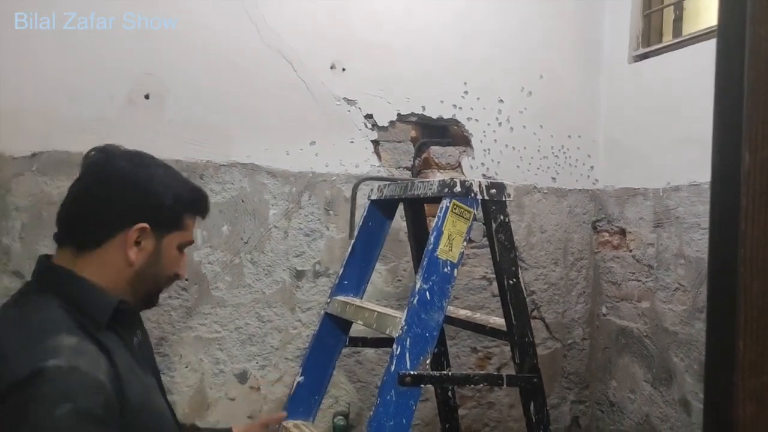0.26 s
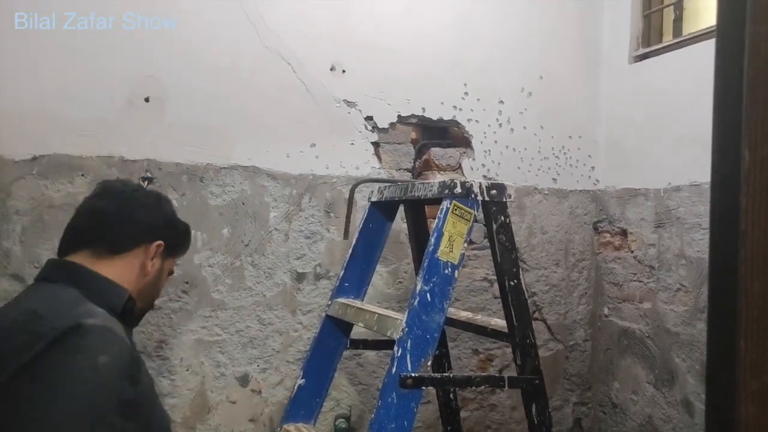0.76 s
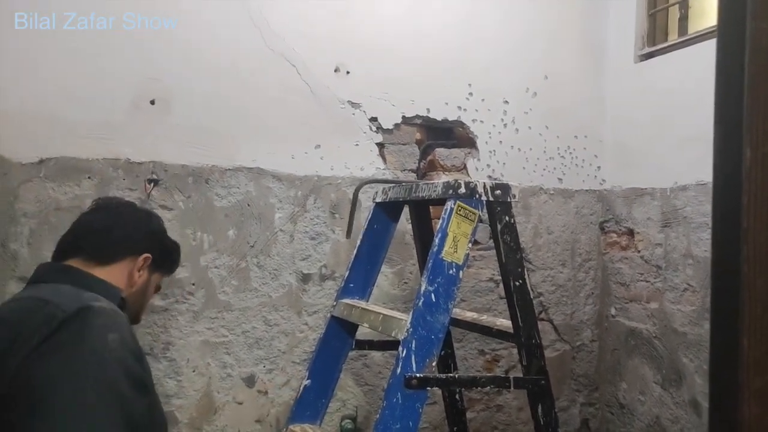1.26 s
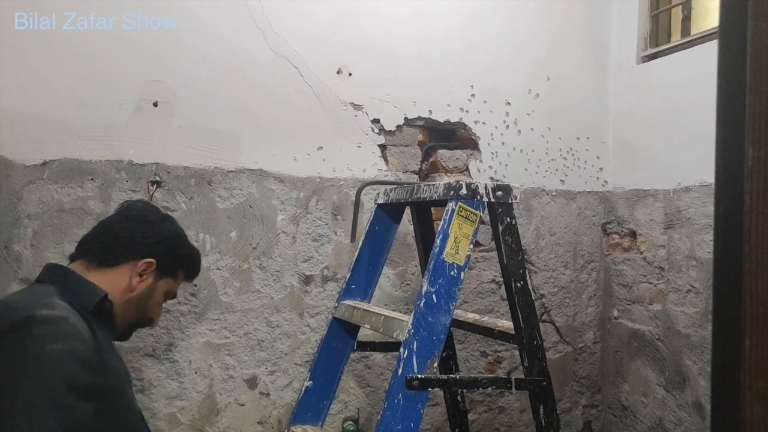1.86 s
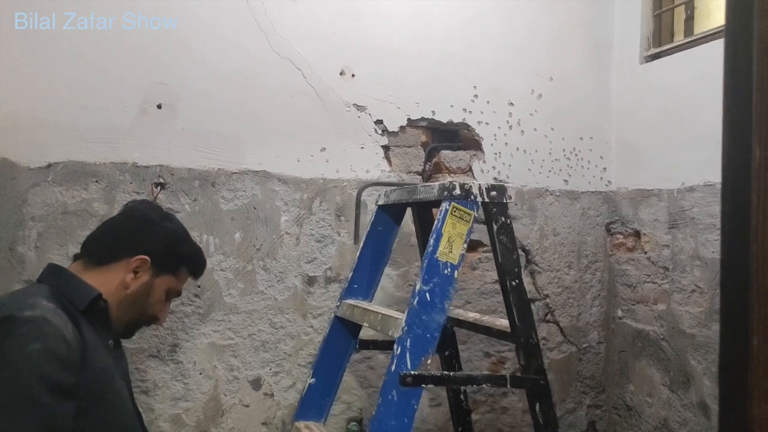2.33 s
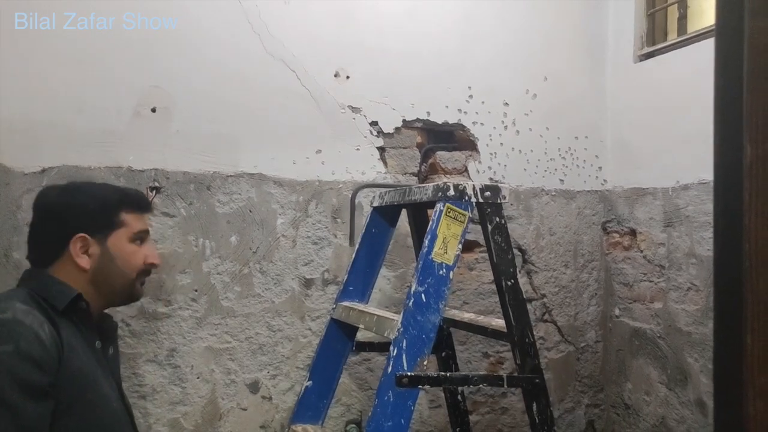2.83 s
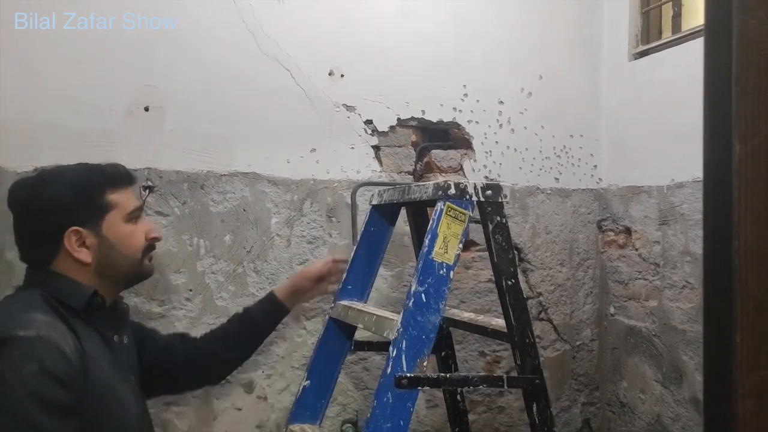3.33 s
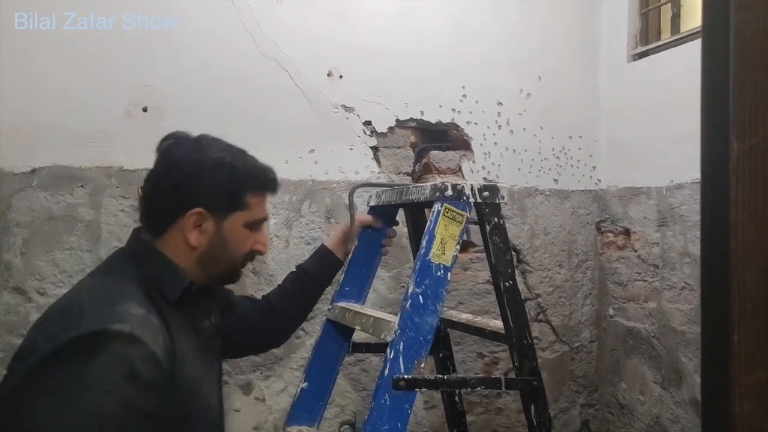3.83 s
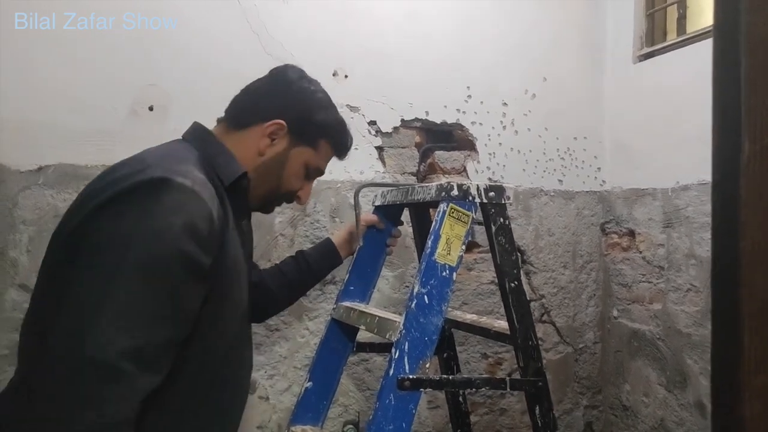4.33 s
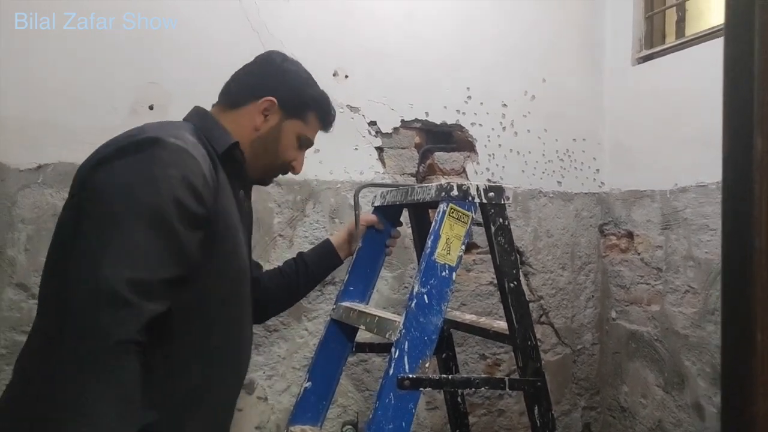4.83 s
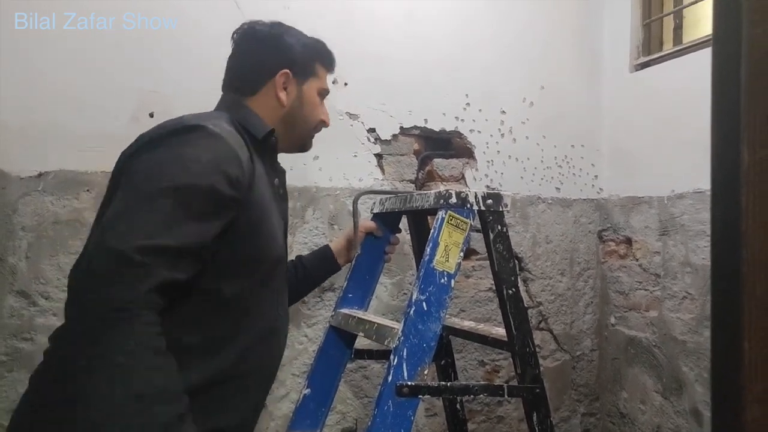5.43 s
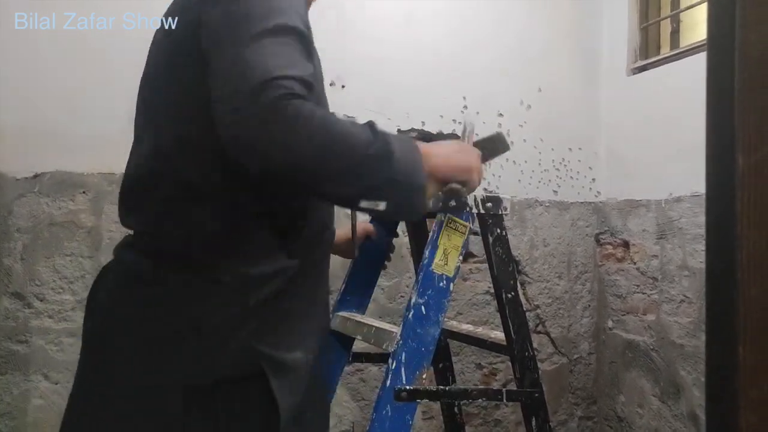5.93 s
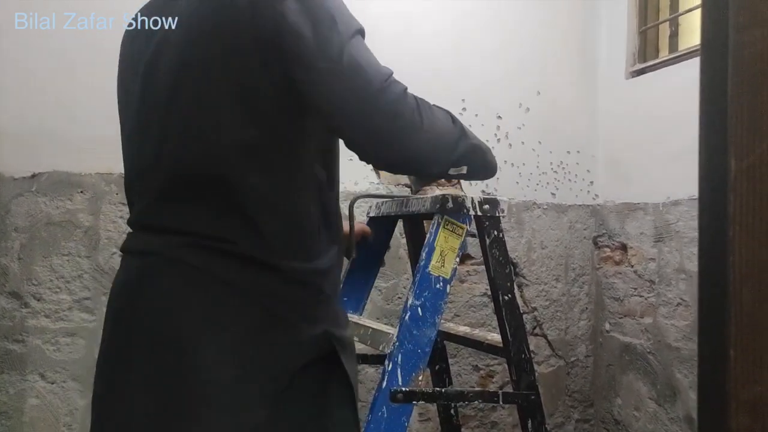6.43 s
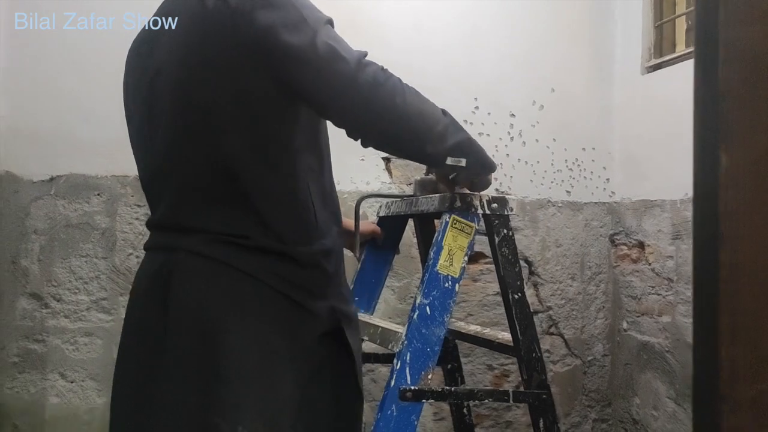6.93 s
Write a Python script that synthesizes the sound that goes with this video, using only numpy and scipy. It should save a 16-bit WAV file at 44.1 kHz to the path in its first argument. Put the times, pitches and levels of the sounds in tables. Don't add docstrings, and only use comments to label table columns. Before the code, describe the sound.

Close stereo phone pickup in a bare, echoing room: gritty scuffs and soft bumps against the microphone, then a dry ticking creak that speeds up and slows down. More scraping leads to a hollow low thud, then a sharp metallic ladder clang rings out. Faint treads and little squeaks fill a quieter spell before loud irregular knocks and rough scraping over hollow metal.

```python
import sys
import numpy as np
from scipy import signal
from scipy.fft import rfft, irfft, next_fast_len
from scipy.io import wavfile
from scipy.ndimage import uniform_filter1d

SR = 44100
rng = np.random.default_rng(int(sys.argv[2]) if len(sys.argv) > 2 else 0)


def volts_from_db(level):
    exponent = np.asarray(level, float) / 20
    return 10 ** exponent


def dump_mix(stems):
    frames = np.atleast_2d(stems).T
    limited = np.clip(frames, -1, 1)
    pcm = np.round(limited * 32767).astype(np.int16)
    wavfile.write(sys.argv[1], SR, pcm)


N = 316197

# pitch_hz, density_db [dB per Hz]
MIC_HISS = [(15, 13), (300, -23), (1500, -42), (4200, -44), (9700, -28.5), (16000, -17)]
# pitch_hz, density_db [dB per Hz]
RUSTLE_COLOUR = [(60, -35), (150, -4), (230, -2.5), (400, -2), (700, -9), (1100, -5.5), (2500, -9.5),
                 (5000, -18.5), (9000, -28)]
# start_s, effort_db
STIR_EFFORT = [(0.0, -18.5), (0.12, -53), (0.2, -27.5), (0.66, -42), (1.24, -32), (1.92, -35.5),
               (2.27, -18.5), (2.41, -34.5), (2.78, -31), (2.95, -39), (3.8, -35), (4.2, -45.5),
               (4.62, -41.5), (5.11, -44.5), (5.55, -36.5), (5.89, -44.5), (6.49, -42.5), (6.9, -12)]
# pitch_hz, likeness [0-1]
PORT_LIKENESS = [(30, .55), (130, .95), (470, .985), (750, .6), (1400, 0), (16000, 0)]
# pitch_hz, left_minus_right_db
PORT_BALANCE = [(100, 0), (700, 3.5), (1300, -4), (2400, -1), (4400, 17.5), (6200, 4.5), (7000, 0),
                (7600, 68), (9000, 60), (11000, 5.5), (16000, 25)]
# pitch_hz, t60_s
ROOM_DECAY = [(100, 0.46), (400, 0.57), (1000, 0.56), (3000, 0.27), (8000, 0.31), (16000, 0.049)]
# pitch_hz, width_hz, level_db
ROOM_RESONANCES = [(340, 14, 7), (675, 45, -5.5), (905, 217, 5.5), (1200, 68, -3), (1573, 610, 5),
                   (2430, 160, 2), (3300, 290, 3.5)]
# start_s, peak_db
PORT_TAPS = [
    (0.104, -4.5),
    (0.153, -3.5),
    (0.21, -6.5),
    (0.251, -4.5),
    (0.349, -9.5),
    (0.642, -2),
    (0.718, -12.5),
    (0.867, -15),
    (1.834, 2.5),
]
# start_s, peak_db
LOOSE_TICKS = [
    (1.078, -27),
    (1.108, -18),
    (1.14, -18),
    (1.155, -23),
    (1.203, -16.5),
]
# start_s, length_s, start_hz, end_hz, level_db
METAL_SQUEALS = [
    (2.49, 0.064, 4860, 4870, -43),
    (4.945, 0.175, 3800, 3580, -50),
    (4.948, 0.11, 3500, 3380, -53),
    (5.14, .04, 3500, 3430, -51),
    (6.71, 0.095, 5410, 5455, -27.5),
    (5.92, 0.07, 1890, 1860, -52),
]
# start_s, slip_rate [slips per s]
SLIP_RATE = [
    (1.092, 101.1),
    (1.15, 72.6),
    (1.21, 45.5),
    (1.26, 46.7),
    (1.31, 77.7),
    (1.40, 187.5),
    (1.46, 197.85),
    (1.54, 109.5),
    (1.585, 52.4),
]
# start_s, peak_db
LONE_SLIPS = [(1.5998, -29.5), (1.6373, -26), (1.797, -26.5), (1.839, -28), (1.8724, -28.5), (1.903, -28),
              (1.934, -29), (1.977, -26.5), (2.0344, -29), (2.596, -30.5)]
# pitch_hz, width_hz, level_db
JOINT_MODES = [(2500, 410, 3), (3400, 360, 6.5), (3780, 340, 6), (4290, 630, 10), (6290, 210, 1),
               (6540, 520, 3), (7720, 460, 0.5), (8770, 470, 4.5), (9850, 290, 2.5), (4660, 440, -2)]
# pitch_hz, width_hz
SILENT_BANDS = [(5500, 300), (7150, 120), (8450, 200)]
# start_s, peak_db, pitch_hz, t60_s
HOLLOW_THUDS = [(.104, -29, 200, .05), (.21, -29, 200, .05), (.254, -30, 220, 0.046),
                (1.45, -29.5, 171, 0.14), (2.631, -0.5, 197, 0.075), (2.65, -5, 225, 0.14),
                (2.664, -8.5, 232.5, 0.14), (2.7, -15, 236, 0.12), (2.735, -10, 188.5, .12),
                (2.742, -16, 456, 0.06), (2.77, -18, 204, 0.11), (2.82, -19.5, 217, 0.14),
                (2.85, -23, 241, 0.12), (6.598, -16, 268, 0.2), (6.66, -16.5, 339, 0.18),
                (6.78, -21, 332, 0.19), (6.859, -13, 374, .07), (6.885, -9.5, 340, 0.16),
                (6.906, -23, 300, 0.074), (6.92, -6, 349, 0.078), (6.934, -4, 355, 0.17),
                (6.982, -5.5, 350, 0.18), (7.012, -13.5, 352, 0.33), (7.083, -15, 360, 0.1)]
# start_s, peak_db
FRAME_BLOWS = [
    (3.166, -39),
    (3.773, -19),
    (3.779, -9),
    (3.813, -16),
    (4.56, -44),
    (5.054, -49),
    (5.918, -67),
    (6.579, -26),
    (6.929, -29),
]
# pitch_hz, level_db, t60_s
FRAME_MODES = [(475, -9, .8), (435, -10, .7), (885, -12, 0.35), (924, 0.5, 0.93), (957, 0, 0.31),
               (1020, -6, 0.48), (820, -14, .5), (1363, -6.5, 0.86), (1412, -5, 0.94), (1660, -9, 0.54),
               (1747, -1, 0.49), (2296, 0, .6), (2547, -5, .6), (2720, -3, .6), (1207, -12, 1),
               (3475, -5, .35), (970, 5, 0.11)]
# pitch_hz, level_db, t60_s
RUNG_MODES = [(854, -24, 0.67), (940, -1.5, 2.3), (970, -21, 2), (1080, 0, 1), (1280, 4, 1.4),
              (1385, 3.5, 1.1), (1520, -1, 0.83), (1790, 4, 1.03), (3545, 8, 0.38), (2300, 12.5, 0.57),
              (2960, 8, 0.45)]
# start_s, length_s, pitch_hz, level_db
THIN_SINGS = [(2.45, 0.15, 931, -43), (5.055, 0.09, 864, -50), (6.16, 0.04, 1850, -56),
              (7.0, 0.17, 536, -36), (6.725, 0.094, 1377, -26), (6.726, 0.067, 2690, -23),
              (6.737, 0.072, 3350, -27), (6.95, 0.13, 7720, -40.5)]
# start_s, length_s, pitch_hz, level_db
HOLLOW_HUMS = [(0.0, 0.37, 308, -37.5), (1.475, 0.03, 7900, -46), (2.09, 0.1, 947, -32),
               (2.09, 0.053, 1570, -27.5), (2.295, 0.025, 7750, -30), (2.635, 0.45, 32.3, -29.5),
               (3.2, 0.047, 815, -48), (3.776, 0.094, 1020, -33), (3.78, 0.09, 480, -27.5),
               (5.1, 0.14, 161, -48), (5.62, 0.23, 155.3, -48.5), (5.318, 0.12, 1307, -34),
               (5.33, 0.11, 1660, -39.5), (6.571, 0.061, 8400, -33), (6.6, 0.093, 258, -42),
               (6.7, 0.1, 340, -32), (6.93, 0.04, 849, -17), (6.955, 0.065, 1000, -20.5)]
# start_s, length_s, pitch_hz, level_db
DAMPED_RASPS = [(3.87, 0.3, 1400, -43.5), (3.8, 0.2, 183, -42.5), (2.2, 0.26, 304, -35),
                (2.632, 0.13, 460, -30.5), (2.633, 0.22, 198, -28), (3.774, 0.051, 3970, -21),
                (3.4, 0.047, 1240, -46), (2.15, 0.46, 134, -38.5), (2.1, 0.08, 1600, -35),
                (3.4, 0.12, 360, -51), (5.65, 0.08, 970, -41.5), (6.59, 0.072, 970, -20.5),
                (6.737, 0.065, 3300, -24.5), (6.933, 0.1, 540, -32), (7.027, 0.052, 5100, -28)]
# pitch_hz, density_db [dB per Hz]
GRIT_COLOUR = [(59, -72), (100, -13), (165, -13.5), (238, -17), (282, -10.5), (348, -9.5), (421, -13.5),
               (478, -11), (509, -18.5), (959, -15), (1850, -15), (2760, -13), (5090, -29.5), (7610, -25),
               (10200, -29), (15600, -33.5)]
# start_s, level_db, weight_db, sand_db
SHORT_TREADS = [(0.176, -14, -21, -12.5), (0.261, -12.5, -19, -0.5), (0.448, -29.5, -1.5, -3.5),
                (0.643, -25, -16, 4), (0.941, -23, -9, -0.5), (1.723, -13.5, -32, -2.5),
                (2.09, -12.5, -4, -3.5), (2.298, -11.5, -33, -3.5), (2.657, -13.5, -26, -3.5),
                (3.164, -25, -8, 1), (3.772, -3, -25, -18), (4.027, -27.5, -5, -2),
                (4.101, -31, -2.5, -8.5), (4.547, -21.5, -16, -0.5), (4.572, -37, 10, 7),
                (4.809, -28, -7, -1.5), (5.05, -31.5, -1.5, 2.5), (5.374, -18.5, -11, -3.5),
                (5.646, -29.5, -1.5, -3), (5.912, -43, -2, 10), (6.15, -44, -26, 10),
                (5.913, -38.5, -18, 8.5), (2.665, -18, -27, -1), (6.97, -9, -21, -30), (6.769, -20, -17, 2),
                (2.106, -29, -10, 0), (2.125, -34, -1, -9), (2.255, -26, -1, -2), (6.636, -31, -12, -16),
                (7.003, -16, -26, -22), (6.573, -8.5, -13, -6.5), (6.672, -7.5, -25, -1.5),
                (6.892, -9, -9, -37), (6.93, -1.5, -12, -2), (6.583, -17.5, -14, -7),
                (6.964, -18, -13, -25), (2.242, -22.5, -10, -5)]
# start_s, level_db, weight_db, sand_db
LONG_SLIDES = [(0.0, -17.5, -5, -11), (0.3, -25.5, -8.5, -29), (0.598, -22.5, -11.5, -4),
               (0.698, -25, -10, -3.5), (1.768, -25.5, -1.5, -9), (2.003, -27.5, 2, -0.5),
               (2.077, -16.5, -6.5, -4.5), (2.11, -29.5, -36, 5.5), (2.215, -18, -30, -2),
               (2.241, -26.5, 2.5, 6.5), (2.356, -19, 1.5, -28), (2.16, -24.5, -10, -4),
               (2.411, -31, -7, 0), (2.48, -27, -30, 4.5), (2.845, -30, -9, -1),
               (3.116, -32.5, -3.5, -10.5), (3.404, -35, -14, 7.5), (3.416, -33, -6, -3),
               (3.594, -33.5, 1.5, -1), (3.629, -23, -10, 2), (3.685, -38, -18, 0), (2.39, -48, -5, 1),
               (1.871, -39.5, 8, 4), (3.05, -46.5, -14, 3), (4.749, -42, -12, -2), (5.43, -42, -5, 6),
               (6.36, -59, 3, -5), (6.781, -27, -14, -3), (6.99, -31, -18, -24), (5.324, -26, -2.5, -10),
               (5.55, -38, -3, 2.5), (6.299, -45, -18, 7), (6.448, -41, 4, -3), (6.618, -10, -5, -18),
               (6.736, -8.5, -36, -4.5), (6.825, -14.5, -4.5, 0), (6.848, -7, -7.5, -1.5),
               (6.959, -28, -39, -48), (7.026, -20, -36, 0.5), (7.161, -4, -47.5, -10.5)]

RIGHT_LAG = 7


def along(table, hz):
    points = np.array(table)
    return np.interp(np.log(np.maximum(hz, 1)), np.log(points[:, 0]), points[:, 1])


def colour(x, gain):
    size = next_fast_len(x.shape[-1] + 4096)
    hz = np.arange(size // 2 + 1) * SR / size
    return irfft(rfft(x, size) * gain(hz), size)[..., :x.shape[-1]]


def unit(x):
    return x / x.std()


def butter(x, order, hz, kind="low"):
    return signal.sosfilt(signal.butter(order, hz, kind, fs=SR, output="sos"), x)


def ring(x, hz, t60):
    p = np.exp(2j * np.pi * hz / SR - np.log(1000) / (t60 * SR))
    return signal.lfilter([0, p.imag], [1, -2 * p.real, abs(p) ** 2], x)


def clicks(times, db):
    x = np.zeros(N)
    np.add.at(x, np.clip((np.asarray(times) * SR).astype(int), 0, N - 1), volts_from_db(db))
    return x


def both_ports(x):
    return np.array([x, np.roll(x, RIGHT_LAG)])


def pair(length):
    mid, side = rng.standard_normal((2, length))
    mid = colour(mid, lambda hz: np.sqrt(1 + np.clip(along(PORT_LIKENESS, hz), 0, 1)))
    side = colour(side, lambda hz: np.sqrt(1 - np.clip(along(PORT_LIKENESS, hz), 0, 1)))
    return np.array([mid + side, mid - side]) / np.sqrt(2)


def air():
    t = np.arange(N) / SR
    settle_db = 66 * np.maximum(t - STIR_EFFORT[-1][0], 0)
    effort_db = np.interp(t, *np.transpose(STIR_EFFORT)) - settle_db

    rumble = unit(colour(pair(N), lambda hz: 1 / (1 + hz / 45) / (1 + (hz / 200) ** 4)))
    rumble = rumble * volts_from_db(-45.5 + 0.086 * effort_db)

    rustle = unit(colour(pair(N), lambda hz: volts_from_db(along(RUSTLE_COLOUR, hz))))
    deep = colour(rustle, lambda hz: 1 / (1 + (hz / 190) ** 6))
    deep_db = np.minimum(effort_db, -30)
    rustle = (rustle - deep) * volts_from_db(effort_db - 8.5) + deep * volts_from_db(deep_db - 8.5)

    hiss = unit(colour(pair(N), lambda hz: volts_from_db(along(MIC_HISS, hz)))) * volts_from_db(-50)
    port_hz, width_hz = 7920, 2600
    port_hiss = colour(rng.standard_normal(N), lambda hz: 1 / (1 + (2 * (hz - port_hz) / width_hz) ** 2))
    hiss[0] += unit(port_hiss) * volts_from_db(-54.5)
    return rumble + rustle + hiss


def room(x, wet_db):
    t = np.arange(SR) / SR
    noise, wash = pair(SR), 0
    for hz in 60 * 2.0 ** np.arange(9):
        octaves = lambda f: np.clip(np.log2(np.maximum(f, 1) / hz), -1, 1)
        band = colour(noise, lambda f: np.cos(np.pi / 2 * octaves(f)) ** 2)
        wash = wash + band * volts_from_db(-60 * t / along(ROOM_DECAY, hz))

    spectrum, hz = rfft(wash), np.arange(SR // 2 + 1)
    power = np.abs(spectrum) ** 2
    even = np.sqrt(uniform_filter1d(power, size=1500) / uniform_filter1d(power, size=70))
    modes_db = 0
    for mode_hz, width, db in ROOM_RESONANCES:
        modes_db = modes_db + db / (1 + (2 * (hz - mode_hz) / width) ** 2)
    wash = irfft(spectrum * even * volts_from_db(modes_db), SR)[:, :SR * 9 // 10]

    build = np.clip((t[:wash.shape[1]] - 0.002) / 0.0024, 0, 1)
    wash = wash * build * volts_from_db(wet_db) / np.sqrt(SR / 20)
    wash[0, 0] = wash[1, RIGHT_LAG] = 1
    return signal.fftconvolve(x[None], wash, axes=1)[:, :N]


def taps():
    touch = clicks(*np.transpose(PORT_TAPS))
    push_back = volts_from_db(-20.5) * np.roll(ring(touch, 86, 0.052), 40)
    suction = ring(touch, 560, 0.002)
    pulse = butter(push_back - suction, 2, 1800)
    return np.array([volts_from_db(-42) * pulse, volts_from_db(0.5) * pulse])


def ticks():
    return both_ports(ring(clicks(*np.transpose(LOOSE_TICKS)), 2450, 0.012))


def squeals():
    out = np.zeros(N)
    for s, length, start_hz, end_hz, db in METAL_SQUEALS:
        n, i = int(length * SR), int(s * SR)
        waver = 1 + 0.007 * uniform_filter1d(rng.standard_normal(SR // 2), 200)[:n]
        phase = 2 * np.pi * np.cumsum(np.linspace(start_hz, end_hz, n) * waver) / SR
        out[i:i + n] += volts_from_db(db) * np.sin(phase) * signal.windows.tukey(n, 0.35)
    return out


def creak():
    rate = np.interp(np.arange(N) / SR, *np.transpose(SLIP_RATE), left=0, right=0)
    slips = np.flatnonzero(np.diff(np.floor(np.cumsum(rate) / SR + 0.94)))
    slip_s, slip_rate = slips / SR, rate[slips]
    start_db = -8 * np.clip((1.2 - slip_s) / 0.12, 0, 1)
    scatter_db = 0.8 * rng.standard_normal(len(slips))
    db = -22 - 9 * np.log10(slip_rate / 50) + start_db + scatter_db
    dull_db = -9 * np.clip((1.32 - slip_s) / 0.2, 0, 1)

    lone_s, lone_db = np.transpose(LONE_SLIPS)
    lone = clicks(lone_s, lone_db + 6)
    low = clicks(slip_s, db) + lone
    high = clicks(slip_s, db + dull_db) + lone

    body = np.zeros(N)
    for k, (hz, width, mode_db) in enumerate(JOINT_MODES):
        sign = (-1) ** (k + 1)
        t60 = np.log(1000) / (np.pi * width)
        body += sign * volts_from_db(mode_db - 7.5) * ring(high if hz > 5000 else low, hz, t60)
    for hz, width in SILENT_BANDS:
        body = signal.lfilter(*signal.iirnotch(hz, hz / width, fs=SR), body)
    body = body + volts_from_db(-10) * np.roll(body, 71)
    body = signal.sosfilt(signal.ellip(4, 1, 40, [1900, 10300], "band", fs=SR, output="sos"), body)

    snap_db = db + 2 * dull_db - 40 * np.log10(slip_rate / 45) + 4
    snaps = clicks(slip_s, snap_db) + volts_from_db(6) * lone
    return body + butter(snaps, 4, 10500, "high")


def thuds():
    out = np.zeros(N)
    for s, db, hz, t60 in HOLLOW_THUDS:
        push = clicks([s], db)
        body = ring(push, hz, t60)
        body += volts_from_db(-12) * ring(push, 2.3 * hz, 0.069)
        body += volts_from_db(-8.5) * ring(push, 1.69 * hz, 0.062)
        out += butter(body, 2, 0.6 * hz, "high")
    return butter(out, 6, 620)


def ladder():
    s, db = np.transpose(FRAME_BLOWS)
    modes = [(hz, mode_db - 8, 0.5 * t60) for hz, mode_db, t60 in FRAME_MODES]
    modes += [(hz, mode_db - 32.5, min(t60, 1.5)) for hz, mode_db, t60 in RUNG_MODES]
    frame = np.zeros(N)
    for hz, mode_db, t60 in modes:
        luck_db = 3 * rng.standard_normal(len(s))
        frame += ring(clicks(s, db + mode_db + luck_db), hz, t60)
    return butter(frame, 2, 330, "high")


def drones():
    out = np.zeros(N)
    for rows, q in ((THIN_SINGS, 70), (HOLLOW_HUMS, 15.7), (DAMPED_RASPS, 2.74)):
        for s, length, hz, db in rows:
            n, i = int(min(length, 0.5) * SR), int(s * SR)
            shake = ring(rng.standard_normal(SR // 2), hz, np.log(1000) * q / (np.pi * hz))
            shake = unit(butter(shake, 2, 0.5 * hz, "high")[-n:])
            share = np.arange(n) / n
            swell = np.minimum(share / 0.045, 1) * 1.155 * (1 - share ** 1.03)
            out[i:i + n] += volts_from_db(db) * shake * swell
    return out


def scuffs():
    grains = rng.standard_normal(N) * volts_from_db(1.9 * rng.exponential(size=N))
    bunches = np.repeat(rng.standard_normal(N // 150 + 1), 150)[:N]
    grains = unit(grains * volts_from_db(3.35 * uniform_filter1d(bunches, size=100)))

    press, t = np.zeros((3, N)), np.arange(SR // 2) / SR
    for rows, rise_s, drag_s in ((SHORT_TREADS, 0.0064, 0.016), (LONG_SLIDES, 0.0066, 0.032)):
        rub = np.minimum(t / rise_s, 1) * np.exp(-np.maximum(t - rise_s, 0) / drag_s)
        for s, db, weight_db, sand_db in rows:
            i = int(max(s - 0.002, 0) * SR)
            press[:, i:i + len(t)] += volts_from_db([[db + weight_db], [db], [db + sand_db]]) * rub[:N - i]

    low = lambda hz: 1 / (1 + (hz / 620) ** 6)
    top = lambda hz: 1 - 1 / (1 + (hz / 3800) ** 6)
    middle = lambda hz: 1 - low(hz) - top(hz)
    out = np.zeros(N)
    for part, share in zip(press, (low, middle, top)):
        gain = lambda hz: volts_from_db(along(GRIT_COLOUR, hz)) * share(hz)
        level = np.sqrt(np.mean(gain(np.linspace(0, SR / 2, num=2000)) ** 2))
        out += colour(part * grains, gain) / level
    return out * volts_from_db(-9)


def scene():
    small = lambda hz: 1 / np.sqrt(1 + (140 / np.maximum(hz, 1)) ** 6)
    steps, knocks = colour(np.array([scuffs(), thuds()]), small)
    knock_wet = volts_from_db(-9)
    far = (1 - knock_wet) * both_ports(knocks)
    far = far + room(steps + knock_wet * knocks + drones(), wet_db=5)
    far = far + room(volts_from_db(1.5) * ladder(), wet_db=-2)
    far = far + room(creak() + squeals(), wet_db=-3) + ticks()

    right_share = lambda hz: 2 / (1 + volts_from_db(2 * along(PORT_BALANCE, hz)))
    resonance = lambda hz: 1 + volts_from_db(7.5) / (1 + ((hz - 7700) / 450) ** 2)
    left = colour(far[0], lambda hz: resonance(hz) * np.sqrt(2 * (2 - right_share(hz))))
    right = colour(far[1], lambda hz: np.sqrt(2 * right_share(hz)))
    return np.array([left, right]) * volts_from_db(-6) + taps() + air()


def band_limit(x):
    return signal.sosfilt(signal.butter(12, 16000, fs=SR, output="sos"), x)


def record(dry):
    cut = signal.sosfilt(signal.ellip(8, 0.2, 50, 15850, fs=SR, output="sos"), dry)
    mix = np.clip(cut, -1, 1)
    return band_limit(mix)


dry = scene()
out = record(dry)
dump_mix(out)
```